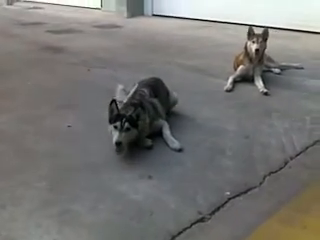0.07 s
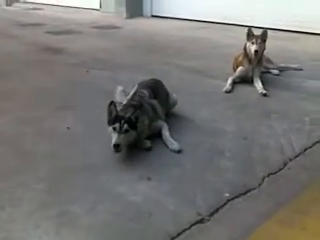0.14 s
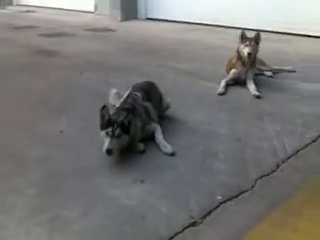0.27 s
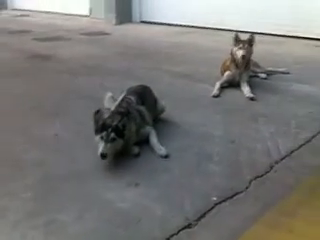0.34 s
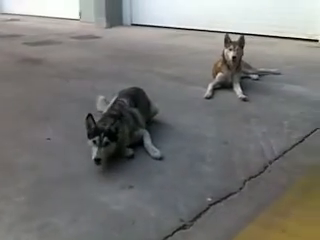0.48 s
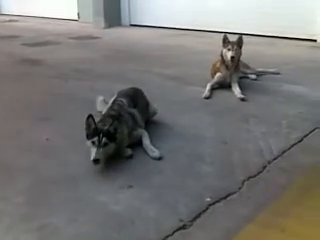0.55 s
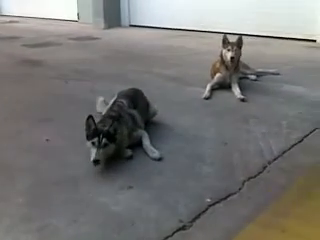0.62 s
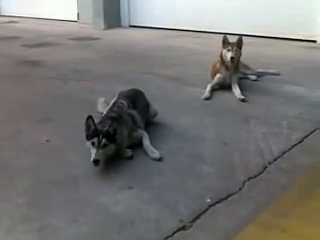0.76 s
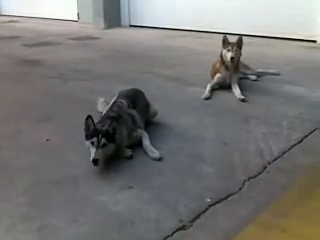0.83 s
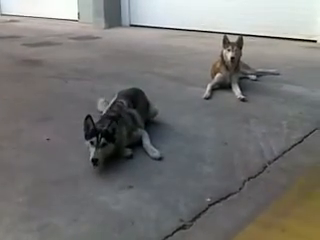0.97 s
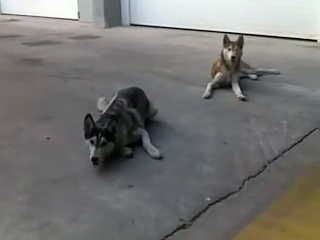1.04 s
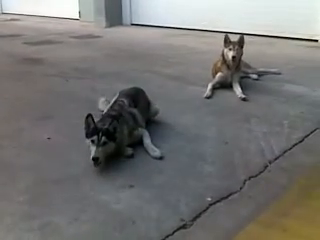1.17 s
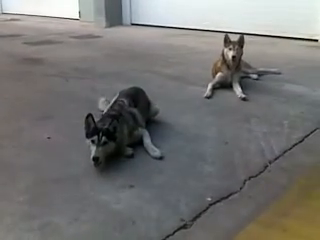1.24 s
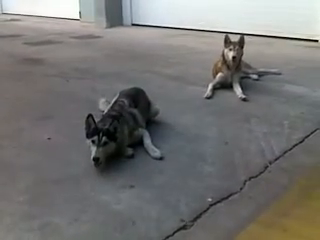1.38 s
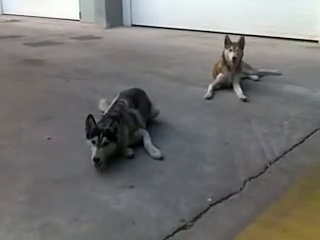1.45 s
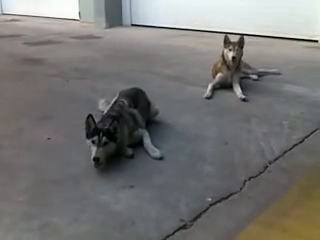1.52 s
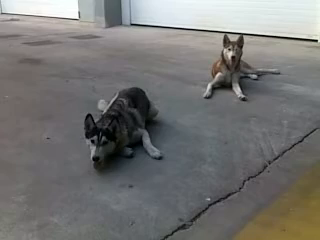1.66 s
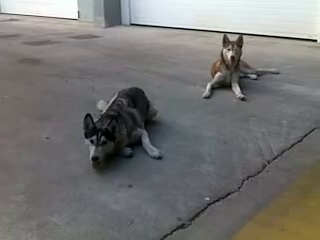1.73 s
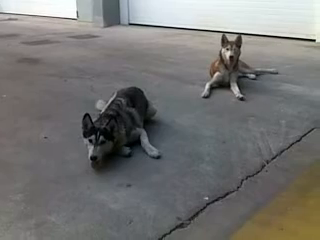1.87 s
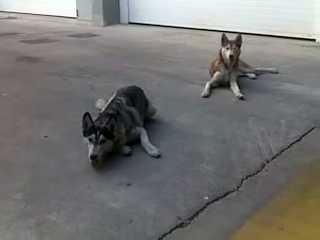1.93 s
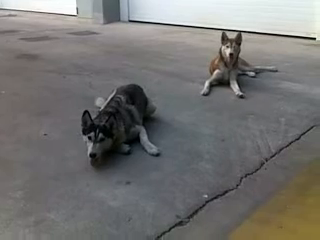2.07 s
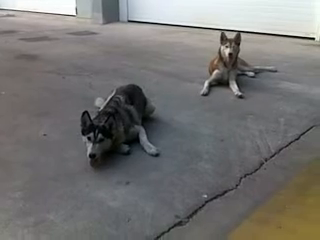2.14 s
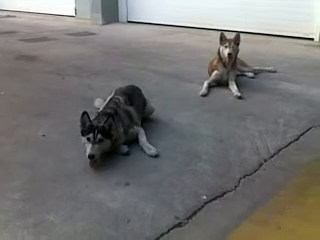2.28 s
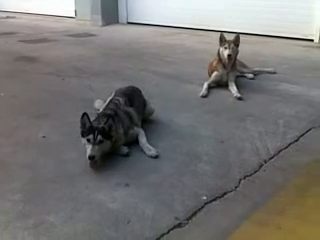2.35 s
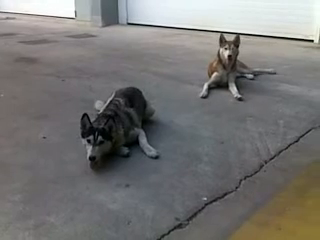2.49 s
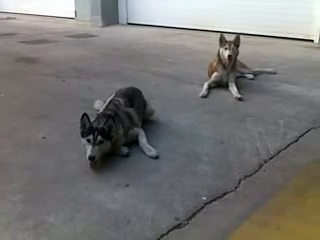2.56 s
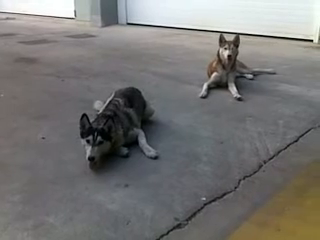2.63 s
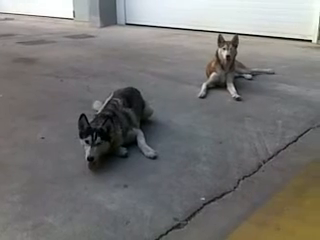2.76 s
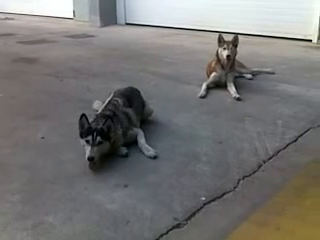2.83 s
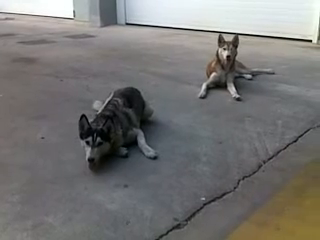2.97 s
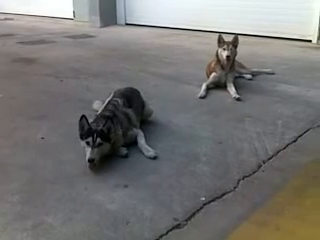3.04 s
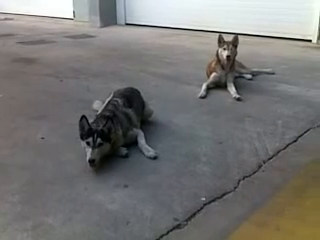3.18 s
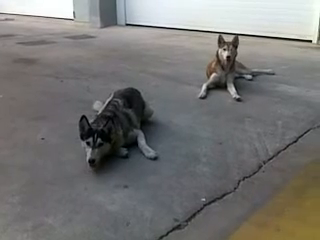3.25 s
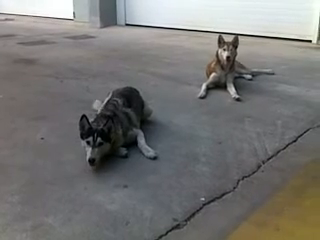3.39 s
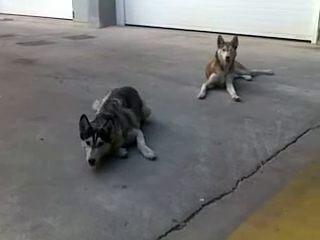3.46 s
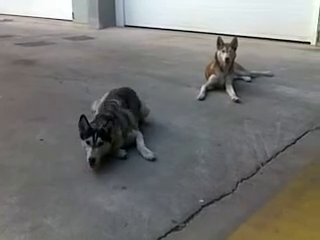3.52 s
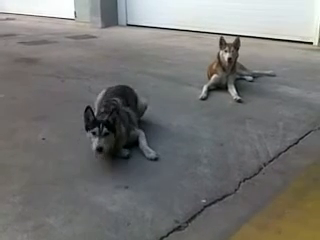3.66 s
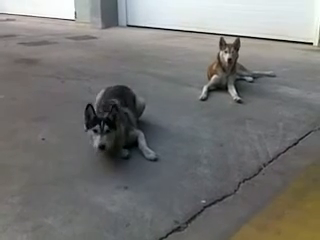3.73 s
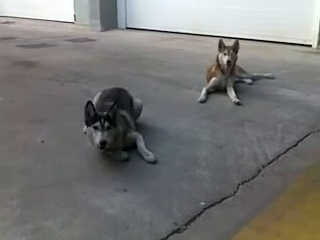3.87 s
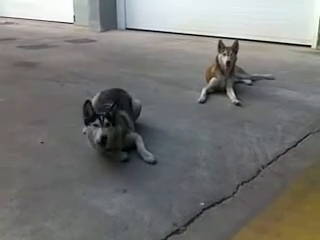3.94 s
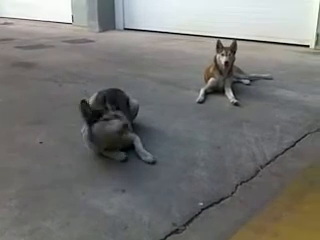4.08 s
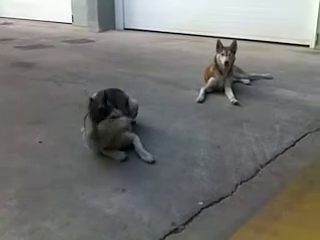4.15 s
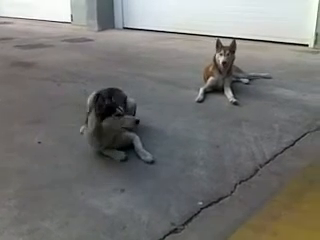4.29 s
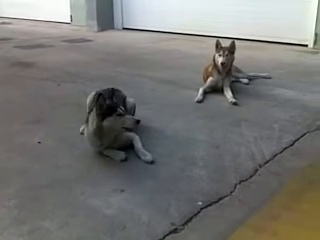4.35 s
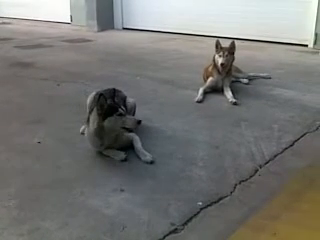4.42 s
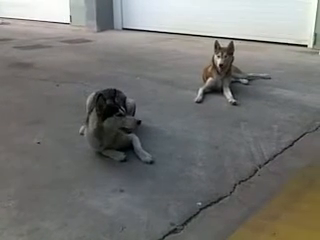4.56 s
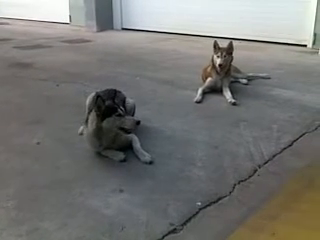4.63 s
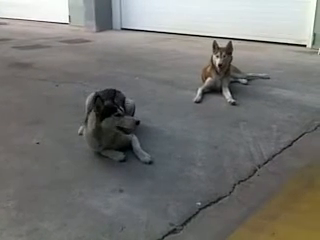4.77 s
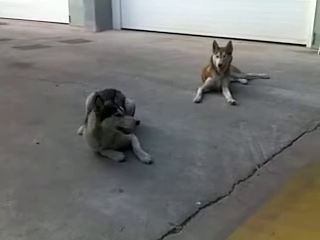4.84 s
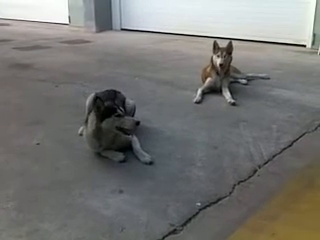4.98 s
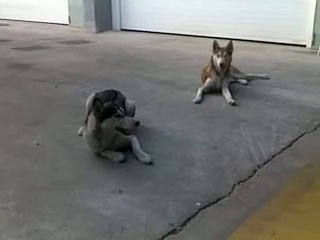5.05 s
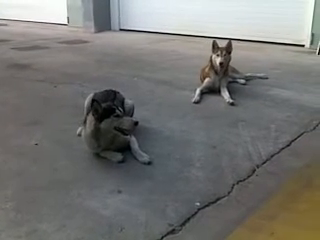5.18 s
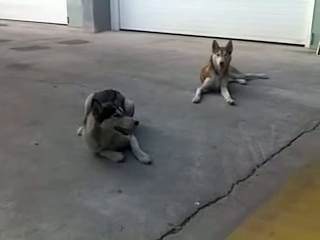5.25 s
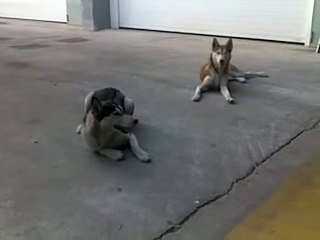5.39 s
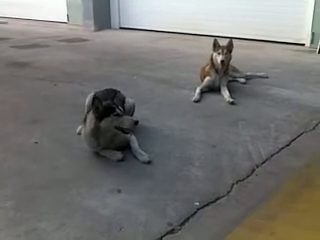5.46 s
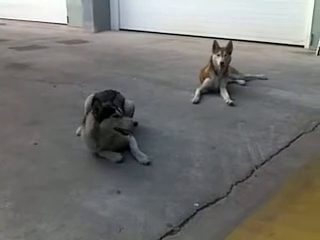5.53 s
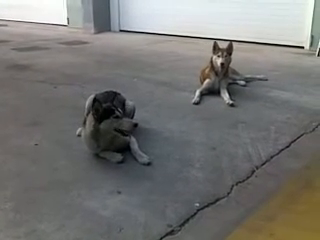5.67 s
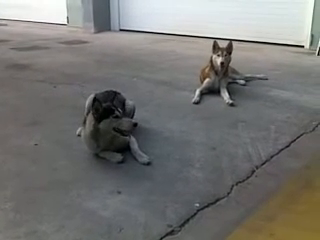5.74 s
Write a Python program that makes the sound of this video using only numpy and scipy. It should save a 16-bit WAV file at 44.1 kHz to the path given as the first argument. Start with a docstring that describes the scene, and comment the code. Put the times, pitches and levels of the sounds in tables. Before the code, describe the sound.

A young dog gives a brief yelp that rises and falls, ringing off the walls and garage door of a concrete yard. After a pause filled only by a steady machine hum, one loud, hoarse bark distorts the microphone, and a softer yip trails into a whimper. The sound is narrow and slightly muffled, with the hum ducking after the calls and creeping back up.

```python
"""A machine hums throughout in a concrete yard. At 0.5 s a young dog yelps: vocal fold pulses and breath
through throat resonances. Walls and a garage door throw back this and each later call; the small
camera's limiter ducks the hum after each and lets it swell back slowly. At 3.6 s one harsh bark opens
with a voiced snap, breaks into a rasp and overloads the microphone.
At 4.1 s a soft yip arches and sinks to a whimper."""
import sys
import numpy as np
from scipy import signal
from scipy.fft import rfft, irfft, next_fast_len
from scipy.io import wavfile
from scipy.ndimage import uniform_filter1d

SR = 44100
rng = np.random.default_rng(int(sys.argv[2]) if len(sys.argv) > 2 else 0)


def unload_wav(signal):
    """Save mono or channel-first audio to the path in sys.argv[1] as 16-bit WAV at rate SR, clipped to [-1, 1]."""
    wavfile.write(
        sys.argv[1],
        SR,
        np.round(np.clip(np.atleast_2d(signal).T, -1, 1) * 32767).astype(np.int16),
    )


N = 256220

# machine tones: f/Hz, level/dB
MACHINE_TONES = [(337.0, -42), (428.0, -48), (455.4, -47.5), (475.6, -29.5), (523.2, -36.5), (543.7, -57.5),
                 (576.9, -49.5), (713.6, -46), (808.5, -60.5), (977.7, -47.5), (1026.4, -47), (1379.2, -42),
                 (1426.6, -51.5), (1465.8, -57.5), (1807.4, -50)]
# fan spectrum: f/Hz, relative density/dB
FAN_SPECTRUM = [(30, -33.5), (90, -26), (150, -18), (220, -7.5), (330, -2.5), (480, 0), (700, -2.5),
                (1050, -3), (1450, -6.5), (2200, -13.5), (3150, -11.5), (3550, -17), (3800, -29),
                (4100, -34)]
# call contours: t/s, pitch/Hz, effort/dB, roughness/0-1, brightness/(dB/octave)
YELP_CONTOUR = [(.527, 257, -30, 0.2, -11), (.548, 290.8, -20.5, .06, -13.5),
                (.566, 322.8, -16.5, 0.25, -1), (.586, 359.8, -10.5, 0.27, -1.5),
                (.6, 392.7, -9, 0.1, -1.5), (.617, 426, -5.5, 0.14, -0.5), (.646, 471.7, -5.5, 0.05, 0),
                (.672, 458, -5.5, 0.11, 1), (.687, 422, -14.5, 0.3, -3), (.702, 344.5, -10, 0.2, 0.5),
                (.716, 309, -19, 0.2, -0.5)]
SNAP_CONTOUR = [(3.622, 295.6, -16.5, 0.53, -2), (3.634, 334, -10, 0.43, 0.24),
                (3.648, 439, -7.5, .4, 0.87), (3.664, 518, -6, 0.44, -1)]
YIP_CONTOUR = [(4.066, 368.2, -16.5, .2, -2.5), (4.102, 420.2, -9, 0.18, -3.5), (4.14, 464, -9, .2, -1),
               (4.168, 425.3, -9, 0.31, -1.5), (4.192, 366.4, -12.5, .3, 2), (4.212, 320.3, -16, 0.41, -1),
               (4.235, 297.7, -19.5, .5, -9), (4.285, 282.7, -17, .3, -10), (4.335, 264, -29, 0.34, -6.5)]
# throat resonances: f/Hz, width/Hz, relative level/dB
YELP_FORMANTS = [(424.7, 86, 3.5), (636, 162, 1), (946, 114, 3), (1211, 222, -1), (1715, 98, -1.5),
                 (1875, 120, -2), (2229, 150, -4), (2644, 220, -14.5)]
SNAP_FORMANTS = [(410, 140, 1), (640, 150, 2.5), (940, 130, 1), (1210, 190, -.5), (1620, 300, -9.5),
                 (2173, 170, -1), (2480, 300, -4.5), (2790, 190, -7.5)]
BARK_FORMANTS = [(564.7, 78, 4.5), (702.3, 70, 4), (892, 90, 0.5), (1251, 215, -3), (1393, 82, -5.5),
                 (1733, 170, -5), (1877, 120, -2.5), (2144, 190, -6), (2333, 98, -9.5), (2616, 210, -9)]
YIP_FORMANTS = [(425, 108, -5.5), (710, 200, -3.5), (907, 250, -2.5), (1227, 630, -8), (1745, 240, -1.5),
                (2260, 240, -11.5), (2730, 210, -8.5)]
# wall echoes: delay/s, level/dB
WALL_ECHOES = [(.0063, -16.5), (.014, -13), (.029, -11.5), (0.054, -13.5), (.094, -13), (.148, -18.5)]
# yard ring: f/Hz, t60/s
YARD_DECAY = [(200, 0.36), (380, 0.66), (560, 1.38), (950, 0.8), (1900, 1.01), (2700, 1.02), (3600, 0.56)]
# treble spits at the loudest moments: centre t/s, length/s, level/dB
TREBLE_SPITS = [(0.615, .008, -57.5), (3.647, 0.049, -57.5), (3.766, .05, -66), (3.816, .026, -69)]


def gain_of(db):
    """dB to amplitude factor."""
    return 10 ** (np.asarray(db) / 20)


def unit_rms(x):
    """Scale to rms 1."""
    return x / np.sqrt(np.mean(x ** 2) + 1e-20)


def log_interp(points, hz):
    """Interpolate (f/Hz, value) points over log frequency."""
    f, value = np.transpose(points)
    return np.interp(np.log(hz + 1), np.log(f + 1), value)


def butterworth(x, order, hz, kind="low"):
    """Causal Butterworth filter."""
    return signal.sosfilt(signal.butter(order, hz, kind, fs=SR, output="sos"), x)


def drift(size, hz):
    """Random wander, rms about 1, bandwidth about hz."""
    span = next_fast_len(size + SR // 2)
    f = np.fft.rfftfreq(span, 1 / SR)
    spectrum = rfft(rng.standard_normal(span)) / (1 + (f / hz) ** 4)
    return unit_rms(irfft(spectrum, span))[:size]


def machine(waver_hz=0.33, flutter=0.017, fan_db=-31):
    """Tones wavering together with motor speed, over fan rush."""
    t, f = np.arange(N) / SR, np.fft.rfftfreq(N, 1 / SR)
    slip_s = np.cumsum(waver_hz * drift(N, 3.69)) / SR / MACHINE_TONES[0][0]
    tones = np.zeros(N)
    for hz, db in MACHINE_TONES:
        rms = gain_of(db) * (1 + flutter * drift(N, 1.3))
        tones += np.sqrt(2) * rms * np.sin(2 * np.pi * (hz * (t + slip_s) + rng.random()))
    rush = unit_rms(irfft(rfft(rng.standard_normal(N)) * gain_of(log_interp(FAN_SPECTRUM, f)), N))
    return tones + rush * gain_of(fan_db + 0.11 * drift(N, 2.4))


def cry(contour):
    """Gesture of a clear call: a smooth glide, muffled where the mouth is nearly shut."""
    times_s, *controls = np.transpose(contour)
    t = np.arange(times_s[0], times_s[-1], 1 / SR)
    glides = [np.interp(t, times_s, control) for control in controls]
    return t, *(uniform_filter1d(glide, size=400, mode="nearest") for glide in glides)


def formant(x, hz, width_hz):
    """Steep unity-gain throat resonance tracking the curve hz."""
    carrier = np.exp(2j * np.pi * np.cumsum(hz) / SR)
    r = np.exp(-np.pi * width_hz / SR)
    return 2 * (carrier * signal.lfilter([(1 - r) ** 2], [1, -2 * r, r * r], x / carrier)).real


def dog(gesture, formants, jitter, doubling, breath, gape, shudder_db, wobble=0.005, quiver=0.033):
    """Fold pulses and air puffs drive the throat. Strain makes pulses uneven, alternately strong, weak."""
    t, pitch_hz, effort_db, rough, bright_db_per_oct = gesture
    size = len(t)
    rough = np.clip(rough, 0, 1)
    waver = 1 + wobble * drift(size, 35) + jitter * rough * drift(size, 180)
    cycles = np.cumsum(pitch_hz * waver) / SR
    # quadratic phase spreads each pulse over its cycle
    folds = unit_rms(sum(np.cos(2 * np.pi * k * cycles + 0.622 * k * k) for k in range(1, 14)))
    folds *= 1 + doubling * rough * np.cos(np.pi * cycles)
    puffs = unit_rms((0.14 + np.exp(-(cycles % 1) / 0.5)) * rng.standard_normal(size))
    drive = (1 - rough) * folds + breath * rough * puffs
    jaw = 1 + gape * (np.sin(np.linspace(0, np.pi, size)) - 2 / np.pi)  # opens, then closes
    voice = np.zeros(size)
    for hz, width_hz, db in formants:
        centre_hz = hz * jaw * (1 + quiver * rough * drift(size, 22))
        tilt_db = bright_db_per_oct * np.log2(hz / 1000)
        voice += gain_of(db + tilt_db) * formant(drive, centre_hz, width_hz)
    voice = butterworth(voice, order=8, hz=2950)
    voice = butterworth(voice, order=2, hz=350, kind="high")  # low cut thins the voice's bass
    voice /= np.sqrt(uniform_filter1d(voice ** 2, size=900) + 1e-12)  # level independent of formants
    voice *= gain_of(effort_db + shudder_db * rough * drift(size, 45)) * signal.windows.tukey(size, 0.04)
    return np.pad(voice, (round(t[0] * SR), N))[:N]


def yard(x, tail_db=-11, build_s=0.023):
    """Direct sound, wall echoes and a diffuse tail with per-band decay."""
    taps = rng.standard_normal(SR) * (rng.random(SR) < 0.08)
    hz, t, bands = signal.stft(taps, SR, nperseg=256)
    bands *= gain_of(-60 * t / log_interp(YARD_DECAY, hz)[:, None]) * (1 - np.exp(-t / build_s))
    response = signal.istft(bands, SR, nperseg=256)[1]
    response *= gain_of(tail_db) / np.linalg.norm(response)
    for delay_s, db in WALL_ECHOES:
        response[round(delay_s * SR)] += gain_of(db)
    return x + signal.fftconvolve(x, response)[:N]


def limiter(x, ceiling_db=-5.0, attack_s=0.0013, recover_db_per_s=7.0):
    """Gain drops fast, recovers slowly; peaks that outrun it clip."""
    level_db = 20 * np.log10(abs(x) + 1e-9)
    recovery_db = np.arange(N) * recover_db_per_s / SR
    held_db = np.maximum.accumulate(level_db + recovery_db) - recovery_db
    pole = np.exp(-1 / (attack_s * SR))
    duck_db = signal.lfilter([1 - pole], [1, -pole], np.minimum(ceiling_db - held_db, 0))
    return np.clip(x * gain_of(duck_db), -gain_of(ceiling_db), gain_of(ceiling_db))


def spits():
    """Short, faint rasps above the voice band."""
    t = np.arange(N) / SR
    hiss = unit_rms(butterworth(rng.standard_normal(N), order=4, hz=[4500, 7500], kind="band"))
    return hiss * sum(gain_of(db) * np.exp(-(2 * (t - centre_s) / length_s) ** 4)
                      for centre_s, length_s, db in TREBLE_SPITS)


def bark(start_s=3.648, attack_s=0.012, hold_s=0.23, release_s=0.07, sag_db_per_s=26.5,
         first_hz=505, top_hz=609.6, glide_s=0.05, break_s=(0.015, 0.05)):
    """Gesture of one hard push of breath: pitch climbs and levels off, voice breaks into a rasp."""
    corners_s = np.cumsum([0, attack_s, hold_s, release_s])
    age_s = np.arange(0, corners_s[-1], 1 / SR)
    pitch_hz = top_hz + (first_hz - top_hz) * np.exp(-age_s / glide_s)
    effort_db = np.interp(age_s, corners_s, [-7, 6, 6, -15]) - sag_db_per_s * age_s
    rough = np.interp(age_s, break_s, [0.25, 0.93])
    bright_db_per_oct = -2 + 21.5 * age_s  # mouth opens
    return start_s + age_s, pitch_hz, effort_db, rough, bright_db_per_oct


def microphone(x, overload=1.45, bias=0.33, smear_hz=900):
    """Asymmetric overload; the electronics delay the lows, breaking up the flat tops."""
    swing = x / overload + bias
    bent = overload * (swing / (1 + swing ** 4) ** (1 / 4) - bias)
    bent = butterworth(bent, order=1, hz=20, kind="high")
    bent = butterworth(bent, order=4, hz=3450)
    pole = np.exp(-2 * np.pi * smear_hz / SR)
    return signal.lfilter([-pole, 1], [1, -pole], bent)


def scene():
    """Yelp, snap into bark, hoarse yip: all echo in the yard, over the machine."""
    calls = dog(cry(YELP_CONTOUR), YELP_FORMANTS,
                jitter=0.098, doubling=0.78, breath=1.5, gape=0.0052, shudder_db=4.5)
    calls += dog(cry(SNAP_CONTOUR), SNAP_FORMANTS,
                 jitter=0.11, doubling=0.97, breath=2.2, gape=0.016, shudder_db=4.0)
    calls += dog(bark(), BARK_FORMANTS,
                 jitter=0.14, doubling=1.0, breath=2.7, gape=0.035, shudder_db=2.0)
    calls += dog(cry(YIP_CONTOUR), YIP_FORMANTS,
                 jitter=0.11, doubling=0.52, breath=0.55, gape=0.01, shudder_db=3.5)
    return (yard(calls) + machine())[None]


def record(dry, band_edge_hz=4100):
    """Microphone, then limiter within a narrow voice band; treble spits on top."""
    low_pass = signal.firwin(301, band_edge_hz, window=("kaiser", 8), fs=SR)
    narrow = signal.oaconvolve(microphone(dry[0]), low_pass, "same")
    ducked = signal.oaconvolve(limiter(narrow), low_pass, "same")
    return (ducked + spits())[None]


dry = scene()
out = record(dry)
unload_wav(out)
```